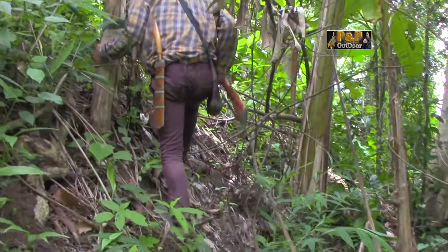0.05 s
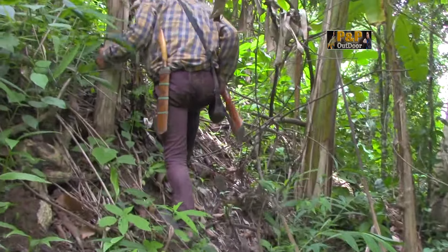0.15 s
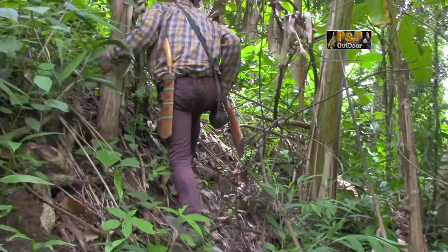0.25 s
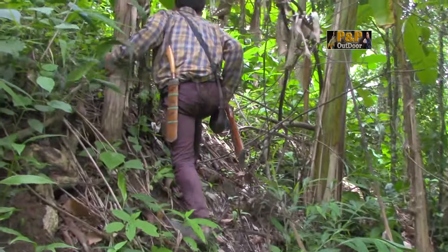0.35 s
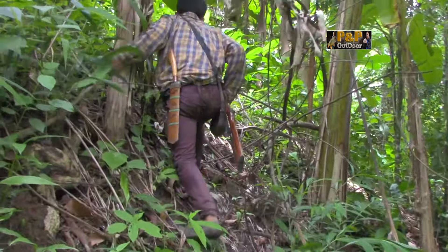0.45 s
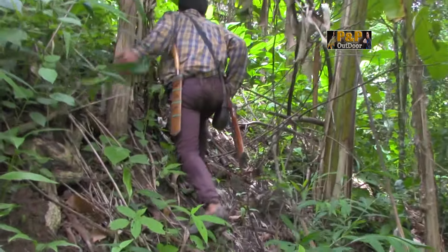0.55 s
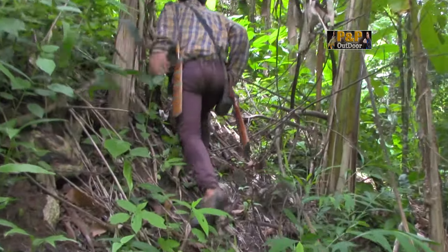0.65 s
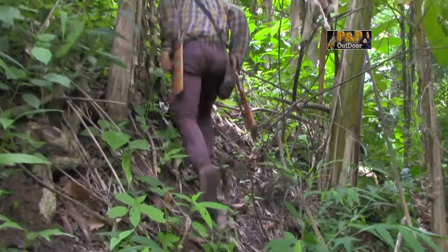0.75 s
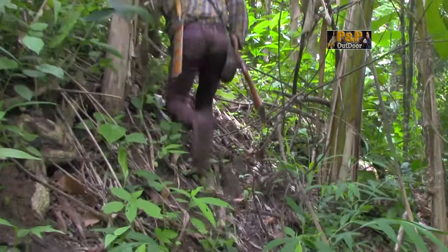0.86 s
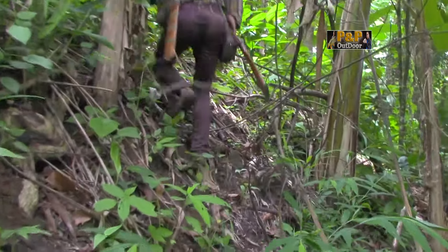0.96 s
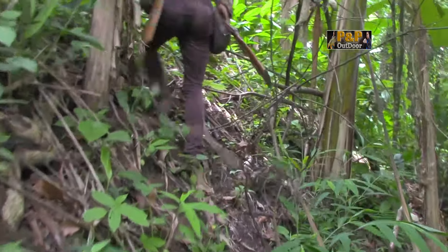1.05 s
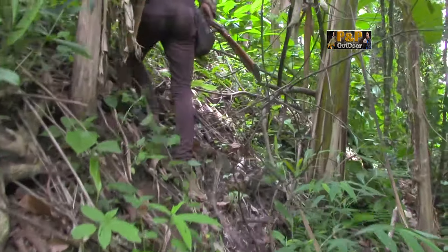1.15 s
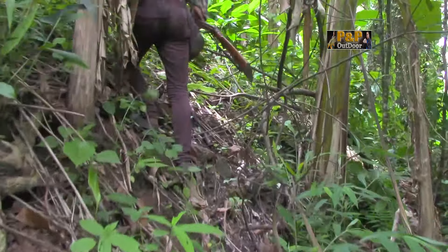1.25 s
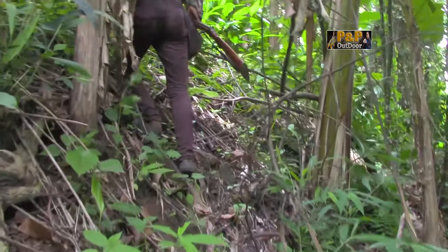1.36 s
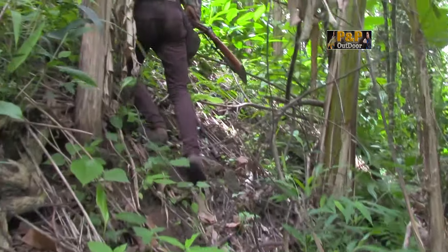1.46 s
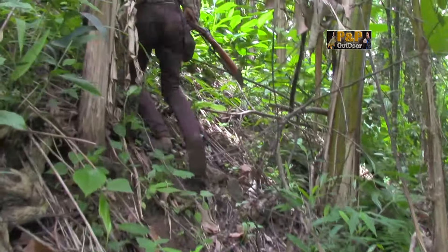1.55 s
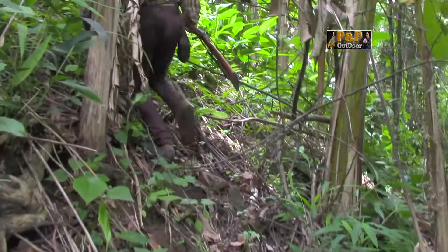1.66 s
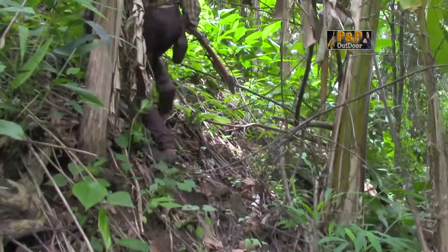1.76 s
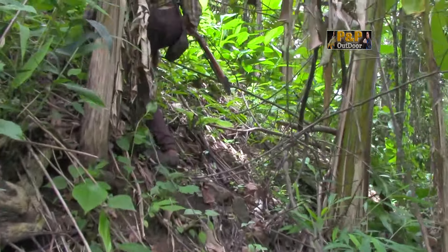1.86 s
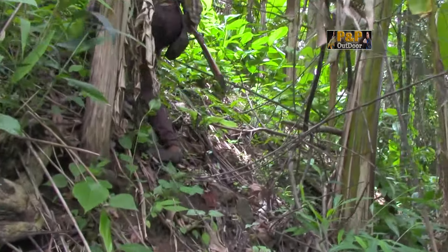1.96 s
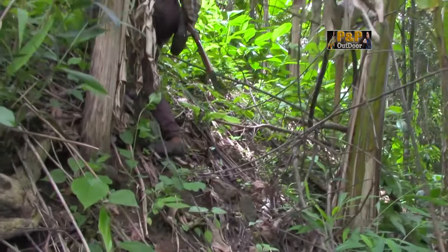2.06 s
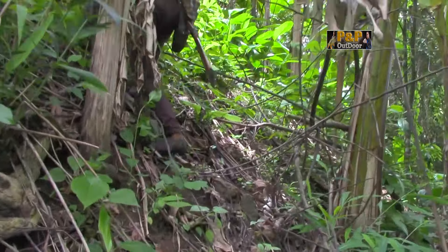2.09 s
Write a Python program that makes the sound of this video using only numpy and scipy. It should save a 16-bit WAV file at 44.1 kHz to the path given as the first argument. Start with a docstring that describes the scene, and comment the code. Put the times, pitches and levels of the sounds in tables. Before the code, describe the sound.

A bird whistles downward again and again in a forest as someone climbs through crackling leaf litter, then shuffles in the undergrowth.

```python
"""Over still forest air and a thin shimmer of insects, someone climbs a slope through dry leaves. From the
start a bird repeats falling whistles, long slides and stepped ones in no fixed order, echoed by the trunks.
Leaves rustle, twigs snap, dull knocks land on the soil and clumps of leaves crunch underfoot. Then the walker
stops and shifts about in the undergrowth: a softer rustle, more snaps and crunches."""
import sys
import numpy as np
from scipy import signal
from scipy.fft import rfft, irfft, next_fast_len
from scipy.io import wavfile
from scipy.ndimage import map_coordinates

SR = 44100
rng = np.random.default_rng(int(sys.argv[2]) if len(sys.argv) > 2 else 0)


def pcm_store(signal):
    """Save signal as 16-bit PCM."""
    levels = np.round(np.clip(np.atleast_2d(signal), -1, 1) * 32767)
    wavfile.write(sys.argv[1], SR, levels.astype(np.int16).T)


N = 264688
TOP_HZ = 16000

# Litter spectra: soil, leaves, dry leaf edges. Each row: frequency in Hz, relative density in dB.
SOIL_SPECTRUM = [(30, -90), (60, -21), (110, -8), (230, 7.5), (550, 7.5), (1000, 0.5), (1500, -1.5),
                 (3000, -23.5)]
LEAF_SPECTRUM = [(60, -45), (500, -26), (900, 6), (1400, 5.5), (3000, 6), (5300, -2), (7000, -5),
                 (11000, -59)]
EDGE_SPECTRUM = [(100, -42), (3500, 3.5), (5200, 6.5), (6500, 6.5), (8200, 7), (10500, 3.5), (13000, -3),
                 (16000, -16)]


def amp(db):
    """Decibels to gain."""
    return 10 ** (np.asarray(db) / 20)


def unit_rms(x):
    """Scale to rms 1."""
    return x / np.sqrt(np.mean(x ** 2) + 1e-20)


def unit_energy(x):
    """Scale to energy 1."""
    return x / np.linalg.norm(x)


def along(points, hz):
    """Read (Hz, value) points on a log axis."""
    knots_hz, values = np.transpose(points)
    return np.interp(np.log(hz + 1), np.log(knots_hz + 1), values)


def wobble(knots_per_s):
    """Smooth random curve."""
    knots = rng.standard_normal(int(N * knots_per_s / SR) + 4)
    return map_coordinates(knots, [np.arange(N) * knots_per_s / SR])


def filtered(x, response):
    """Zero-phase filter with gain response(hz)."""
    m = next_fast_len(N + SR // 4)
    return irfft(rfft(x, m) * response(np.fft.rfftfreq(m, 1 / SR)), m)[:N]


def shaped(x, spectrum):
    """Filter by (Hz, dB) points."""
    return filtered(x, lambda hz: amp(along(spectrum, hz)))


def struck(x, response):
    """Short sound through a minimum-phase filter, at energy 1."""
    n = len(x)
    cepstrum = irfft(np.log(response(np.fft.rfftfreq(n, 1 / SR) + 1) + 1e-6), n)
    cepstrum[1:n // 2] *= 2
    cepstrum[n // 2 + 1:] = 0
    return unit_energy(irfft(rfft(x) * np.exp(rfft(cepstrum)), n))


def add(track, start_s, x):
    """Mix x into the track."""
    i = max(0, round(start_s * SR))
    track[i:i + len(x)] += x[:max(0, N - i)]


def air_and_insects():
    """Still forest air and narrow bands of distant insects that swell together."""
    # Each row: frequency in Hz, relative density in dB.
    air_spectrum = [(25, -27), (45, -23), (80, -12), (250, 0), (600, -1), (1100, -9), (2500, -11),
                    (5000, -15), (8000, -18), (12000, -25), (16000, -33)]
    # Each row: centre in Hz, width in Hz, level in dB, share of a swell followed.
    choruses = [(4590, 170, -59, .8), (4780, 250, -63, .8), (6720, 110, -62.3, .3), (9010, 110, -62.6, .3),
                (9540, 170, -61.3, .3), (9980, 230, -68, .3)]
    # Each row: peak time in seconds, rise in dB.
    swells = [(1.61, 7), (2.43, 7), (2.74, 7), (3.54, 7), (3.77, 4), (4.19, 5.5), (4.5, 4), (5.46, 5),
              (5.7, 4), (5.96, 5)]
    t, swell_width_s = np.arange(N) / SR, .06
    swell_db = sum(db * np.exp(-.5 * ((t - peak_s) / swell_width_s) ** 2) for peak_s, db in swells)
    track = amp(-53) * unit_rms(shaped(rng.standard_normal(N), air_spectrum))
    for centre_hz, width_hz, db, share in choruses:
        chorus = filtered(rng.standard_normal(N),
                          lambda hz: np.exp(-.5 * ((hz - centre_hz) / width_hz) ** 2))
        track += amp(db + share * swell_db + 1.2 * wobble(14)) * unit_rms(chorus)
    return track


def stir_db():
    """How hard the walker disturbs soil and leaves, per sample."""
    # Each row: time in seconds, soil level in dB, leaf level in dB.
    effort = [(0.0, -41, -45), (0.3, -46, -42.5), (.48, -41, -38.5), (.62, -38.5, -39.5),
              (0.72, -39.5, -37), (.83, -39, -37), (.91, -41.5, -38.5), (1.02, -40, -36.5),
              (1.17, -42, -37.5), (1.42, -42, -43.5), (1.8, -43, -47), (1.97, -45, -44.5),
              (2.15, -49.5, -50), (2.38, -50, -44.5), (2.59, -43, -48), (2.76, -41, -43),
              (2.94, -44, -49.5), (3.2, -53, -48.5), (3.33, -52.5, -50), (3.62, -51, -58.5),
              (3.78, -49.5, -50.5), (4.03, -51, -55), (4.45, -52.5, -48.5), (4.6, -50, -53),
              (4.72, -49, -45), (4.9, -52.5, -50), (5.14, -51.5, -47.5), (5.52, -60, -52.5),
              (5.72, -59, -51.5), (6.0, -60, -49.5)]
    times_s, *levels_db = np.transpose(effort)
    return [np.interp(np.arange(N) / SR, times_s, db) for db in levels_db]


def ticks(per_s, centre_hz, cycles, spread_db):
    """Single leaves and stalks flick and ring for a few cycles, each at its own pitch."""
    starts = (rng.random((int(per_s * N / SR), 1)) * N).astype(int)
    traits = rng.standard_normal((len(starts), 2))
    hz = np.clip(centre_hz * 2 ** (0.81 * traits[:, :1]), 500, 13000)
    size = amp(spread_db * np.minimum(traits[:, 1:], 2)) * np.sqrt(hz)
    i = np.arange(SR // 100)
    phase = hz * i / SR
    grains = size * np.sin(2 * np.pi * phase) * np.exp(-phase / cycles)
    return unit_rms(np.bincount((starts + i).ravel(), grains.ravel(), N)[:N])


def crackle(spectrum, per_s, spread_db, blur):
    """Tiny fractures of unequal size over their own blurred scatter."""
    breaks = rng.random(N) < per_s / SR
    sizes = rng.choice([-1, 1], N) * amp(spread_db * np.minimum(rng.standard_normal(N), 2))
    grains = unit_rms(breaks * sizes) + blur * rng.standard_normal(N)
    return unit_rms(shaped(grains, spectrum))


def rustle():
    """Legs move the litter: soil scuffs, leaves catch and slip in clumps, dry edges sizzle."""
    scuff_db, rustle_db, sizzle_db = 0.5, 1, -1  # relative to the stir
    soil_db, leaf_db = stir_db()
    clumps_db = 1.1 * wobble(55)
    flicks = ticks(per_s=220, centre_hz=2800, cycles=3, spread_db=5)
    prickles = ticks(per_s=350, centre_hz=8000, cycles=3, spread_db=5)
    soil = crackle(SOIL_SPECTRUM, per_s=500, spread_db=3, blur=.9)
    leaves = unit_rms(crackle(LEAF_SPECTRUM, per_s=900, spread_db=5, blur=1) + .55 * flicks)
    edges = unit_rms(crackle(EDGE_SPECTRUM, per_s=900, spread_db=5, blur=1.2) + .3 * prickles)
    foliage = amp(rustle_db) * leaves + amp(sizzle_db + wobble(76)) * edges
    return amp(clumps_db) * (amp(soil_db + scuff_db) * soil + amp(leaf_db) * foliage)


def whistles(contour, calls):
    """A nearly pure tone quavers more as it falls; foliage scatters and blurs it."""
    held_s, falling_s, quaver_depth, thicket_t60_s = .14, .2, .024, .22
    track = np.zeros(N)
    times_s, pitch_hz, level_db = np.transpose(contour)
    fade = amp(-60 * np.arange(SR // 4) / SR / thicket_t60_s)
    for start_s, db, transpose, stretch, direct in calls:
        t = np.arange(int(times_s[-1] * stretch * SR)) / SR / stretch
        depth = np.interp(t, [held_s, falling_s], [quaver_depth / 3, quaver_depth])
        quaver = depth * wobble(260)[:len(t)]
        flutter_db = 2 * wobble(45)[:len(t)]
        hz = transpose * np.interp(t, times_s, pitch_hz) * (1 + quaver)
        envelope = amp(db + flutter_db + np.interp(t, times_s, level_db))
        call = envelope * np.sin(2 * np.pi * np.cumsum(hz) / SR)
        thicket = unit_energy(fade * rng.standard_normal(len(fade)))
        add(track, start_s, np.sqrt(direct) * call)
        add(track, start_s, np.sqrt(1 - direct) * signal.fftconvolve(call, thicket))
    return track


def bird():
    """Long slides and stepped whistles recur in no fixed order; the trunks answer."""
    # Each row: time into the whistle in seconds, pitch in Hz, relative level in dB.
    slide = [(0, 4350, -22), (.035, 4100, -8), (.07, 3900, -5), (.095, 3820, 0), (.115, 3790, 1),
             (.15, 3710, -2), (.195, 3540, -1.5), (.24, 3340, -1), (.29, 3150, 0), (.335, 2850, -4),
             (.38, 2700, -9), (.42, 2650, -35)]
    stepped = [(0, 4450, -16), (.03, 4310, -3.5), (.08, 4270, -2), (.11, 4200, -7), (.125, 3850, -6),
               (.145, 3580, 0), (.2, 3330, 1), (.235, 3150, -1), (.29, 2850, -24)]
    # Each row: start in seconds, level in dB, pitch factor, length factor, direct share of power.
    slide_calls = [(0.0, -45.3, 1.0, 1.04, .25), (1.435, -45.2, 1.0, 1.08, .2), (3.05, -47.5, .98, .9, .05),
                   (3.805, -43, 1.0, 1.0, .55)]
    stepped_calls = [(2.135, -49.8, 1.01, 1.04, .15), (4.385, -48.5, 1.0, 1.1, .02),
                     (5.72, -50.5, 1.0, 1.1, .05)]
    song = whistles(slide, slide_calls) + whistles(stepped, stepped_calls)
    return song + amp(-8) * echoes(song)


def echoes(x):
    """Trunks and foliage return a diffuse tail after 8 ms."""
    # Each row: frequency in Hz, t60 in seconds.
    decay = [(150, .4), (1000, .55), (4000, .65), (12000, .25)]
    hz, t, noise = signal.stft(rng.standard_normal(SR // 2), SR, nperseg=256)
    tail = signal.istft(noise * amp(-60 * t / along(decay, hz)[:, None]), SR, nperseg=256)[1]
    return signal.fftconvolve(np.pad(x, (int(.008 * SR), 0)), unit_energy(tail))[:N]


def stray_stalks(per_s, over_stir_db, centre_hz):
    """Small stalks give way at random, louder in a harder stir. Returns rows for snaps()."""
    leaf_db = stir_db()[1]
    starts = rng.integers(0, N, per_s * N // SR)
    traits = rng.standard_normal((len(starts), 2))
    return [(i / SR, leaf_db[i] + over_stir_db - 1.5 * weakness, centre_hz * 2 ** (pitch / 2), 1)
            for i, (weakness, pitch) in zip(starts, traits)]


def snaps():
    """Twig fibres tear, the broken ends ring briefly, ground and leaves throw the crack back."""
    # Each row: start in seconds, strength in dB, centre in Hz, half-width in octaves.
    twigs = [(.128, 2.5, 4150, 0.93), (.2816, -12, 3330, 1.3), (.367, -9, 2940, 0.6), (.39, -4, 4550, 1.2),
             (.5461, 9, 7850, 0.39), (.5463, 2, 1520, 1.8), (.549, 0, 8500, 1.55), (.583, -9, 1000, 0.73),
             (.5895, -4.5, 750, 0.74), (.606, -9, 10000, 0.35), (.6393, -5, 1400, 0.55),
             (.6585, -11, 2300, 1.3), (.6922, -3.5, 3880, 0.63), (.6957, -8, 4470, 0.84),
             (.7322, -5.5, 5460, 1), (.7468, -2.5, 1290, 0.9), (.812, -7, 4500, 1.6),
             (.848, -6.5, 9000, .5), (.992, -10, 1400, 0.59), (.993, -6, 7100, 0.69),
             (1.097, -8, 2420, 0.95), (1.103, -3.5, 3230, 0.8), (1.107, -1.5, 9000, 0.39),
             (1.115, -4, 8000, 1.1), (1.238, -10, 1800, 0.82), (1.246, -6, 5500, 0.59),
             (1.3273, -9.5, 4600, 0.36), (1.346, -12, 3800, 1.2), (1.3501, -5.5, 4220, 0.74),
             (1.421, -9, 3000, .7), (1.439, -16, 10000, 0.56), (1.846, -2, 2210, 3.5),
             (1.853, 2, 5100, 0.59), (1.865, -7, 1200, 1.1), (1.874, 2, 4880, 1.74),
             (2.1554, -17, 2010, 1.3), (2.2447, -22, 2800, 0.86), (2.475, -14, 5000, 0.78),
             (2.698, -3.5, 9000, 0.65), (2.841, -13, 2200, 0.5), (3.0374, -7, 2400, 0.41),
             (3.06, -5, 1270, 1.5), (3.073, -10, 1700, 1.1), (3.086, -4.5, 2180, 1.3),
             (3.14, -8, 4000, 0.68), (3.2025, -9, 1610, 1.04), (3.3746, -16, 2000, 0.95),
             (3.4395, -10.5, 3990, 1.8), (3.4599, 2.5, 1310, 1.17), (3.4637, 0, 1880, 1.13),
             (3.495, -14, 3500, 0.76), (3.673, -13, 1380, 1.1), (3.721, -14, 3180, 1.1),
             (3.762, -12.5, 2920, 1.2), (4.4273, -31, 3600, .8), (4.45, -7, 3600, 0.62),
             (4.4752, -17, 5500, 1.9), (4.75, -18, 5000, 1.6), (4.783, -15.5, 10840, 0.36),
             (4.831, -10.5, 890, 1.7), (4.833, -15, 2400, .4), (4.9495, -11, 4500, 1.4),
             (4.955, -7, 4500, 1.3), (5.024, -17, 2600, 0.6), (5.029, -11, 6460, 1),
             (5.1945, -11.5, 8500, 0.31), (5.1995, -10, 7000, 1.3), (5.223, -13, 7600, 0.74),
             (5.4155, -16.5, 3620, 0.47), (5.5308, -26, 2930, 0.37), (5.57, -8.5, 2460, 2.5),
             (5.6096, -15, 3600, .7), (5.625, -14.5, 6000, 2.7), (5.7842, -16, 4170, 1.4),
             (5.8165, -10, 2070, 1.26)]
    tear_t60_s, scatter_t60_s, wood_t60_s = .003, .03, .018
    ground_db, wood_db = -10, -8
    track, t = np.zeros(N), np.arange(SR // 10) / SR
    stalks = stray_stalks(per_s=5, over_stir_db=13.5, centre_hz=3080)
    for start_s, db, centre_hz, octaves in list(twigs) + stalks:
        def band(hz):
            off_centre = np.log2(hz / centre_hz) / octaves
            return ((1 + off_centre ** 4) * (1 + (hz / 11000) ** 6) * (1 + (200 / hz) ** 4)) ** -.5

        fibres = rng.standard_normal(len(t)) * amp(-60 * t / tear_t60_s)
        tear = struck(fibres, lambda hz: 1 / np.abs(rfft(fibres)))  # flat spectrum, no pitch
        scatter = rng.standard_normal(len(t)) * amp(-60 * t / scatter_t60_s)
        scatter = unit_energy(scatter * (1 - np.exp(-t / tear_t60_s)))
        scatter_db = -2.5 - 0.34 * db  # weak twigs lie deeper and scatter more
        bounce = np.roll(tear, int(rng.uniform(.0025, .0036) * SR))
        pulse = tear + amp(ground_db) * bounce + amp(scatter_db) * scatter
        modes_hz = np.minimum(centre_hz * 2 ** (.55 * octaves * rng.standard_normal((4, 1))), TOP_HZ)
        wood = np.sin(2 * np.pi * modes_hz * t).sum(axis=0) * amp(-60 * t / wood_t60_s)
        crack = struck(pulse, band) + amp(wood_db) * struck(wood, band)
        add(track, start_s, amp(db) * unit_energy(crack))
    return track


def knocks():
    """Blunt contact on soil, roots or hollow sticks rings two damped modes and shakes debris."""
    # Each row: start in seconds, strength in dB, pitch in Hz, t60 in seconds.
    contacts = [(.129, -11, 950, .06), (.628, -12, 450, .03), (.64, -6, 400, .055), (.871, -7, 790, .03),
                (.877, -9, 520, .03), (.97, -9, 750, .04), (1.3465, -9, 4100, .025), (1.639, -12, 330, .05),
                (1.85, -7, 590, .06), (2.70, -5.5, 1480, .05), (3.004, -4, 420, .025), (3.06, -5, 595, .04),
                (3.461, -13, 860, .04), (3.466, -6, 590, .09), (3.468, -22, 95, .12),
                (4.318, -24.5, 105, .12), (4.4505, -17, 3400, .025), (4.831, -4.5, 225, .11),
                (4.832, -9, 315, .08), (5.023, -17, 930, .04), (5.024, -10.5, 2250, .03),
                (5.026, -13, 3170, .03), (5.205, -17, 900, .06), (5.425, -18, 420, .05),
                (5.57, -16, 470, .05), (5.571, -16, 1690, .03), (5.572, -18, 6900, .03),
                (5.817, -16, 2820, .03)]
    track, t = np.zeros(N), np.arange(SR // 3) / SR
    for start_s, db, pitch_hz, t60_s in contacts:
        fade = amp(-60 * t / t60_s)
        phase = 2 * np.pi * pitch_hz * t
        modes = fade * (np.sin(phase) + 0.5 * np.sqrt(fade) * np.sin(2.06 * phase))
        ring = struck(modes, lambda hz: hz / np.hypot(hz, pitch_hz))  # small bodies radiate little bass
        shake = fade * rng.standard_normal(len(t))
        debris = struck(shake, lambda hz: 1 / (1 + 2 * np.log2(hz / pitch_hz) ** 4))
        add(track, start_s, amp(db) * (ring + 0.72 * debris))
    return track


def crunches():
    """A foot or hand crushes leaves: fractures swell and thin out. Crisper means more edge, less soil."""
    # Each row: start in seconds, length in seconds, leaf level in dB, crispness in dB.
    crushes = [(0.333, 0.073, -43, -6), (.585, 0.086, -47.5, -10), (.78, 0.069, -39, 4),
               (.955, 0.04, -44, 9.5), (1.09, 0.054, -33.5, 2.5), (1.234, 0.05, -39.5, -6),
               (1.837, 0.059, -33, 1.5), (2.437, 0.062, -50.5, 8.5), (2.695, 0.027, -50.5, 14.5),
               (3.01, 0.08, -38, -2.5), (3.051, 0.089, -37, 2), (3.456, 0.069, -51, -14.5),
               (4.202, 0.1, -44.5, 1), (4.301, 0.055, -39, -0.5), (4.859, 0.041, -44, -0.5),
               (4.948, 0.021, -42.5, 0), (5.015, 0.027, -44, 6), (5.19, 0.054, -45.5, 2.5),
               (5.26, 0.051, -48.5, 8.5), (5.398, 0.046, -47.5, 6), (5.6, 0.054, -46, 1.5),
               (5.806, 0.071, -46, 5.5)]
    soil_db, edge_db = -2, -3.5  # relative to the leaves
    pressure = np.zeros((3, N))
    for start_s, length_s, db, crisp_db in crushes:
        progress = np.linspace(0, 1, int(length_s * SR))
        swell = unit_rms(progress ** 0.5 * (1 - progress) ** 0.59)
        for track, part_db in zip(pressure, [soil_db - crisp_db, 0, edge_db + crisp_db]):
            add(track, start_s, amp(db + part_db) * swell)
    flicks = ticks(per_s=700, centre_hz=3000, cycles=2.5, spread_db=4)
    soil = crackle(SOIL_SPECTRUM, per_s=900, spread_db=3, blur=.6)
    leaves = unit_rms(crackle(LEAF_SPECTRUM, per_s=1600, spread_db=5, blur=.7) + .6 * flicks)
    edges = crackle(EDGE_SPECTRUM, per_s=2000, spread_db=6, blur=.7)
    return np.sum(pressure * [soil, leaves, edges], axis=0)


def leaf_scatter(x, t60_s=.035):
    """Side signal: nearby leaves scatter sound unequally to the two microphones."""
    t = np.arange(SR // 10) / SR
    scatter = rng.standard_normal(len(t)) * amp(-60 * t / t60_s)
    return signal.fftconvolve(x, unit_energy(scatter))[:N]


def scene():
    """Walker ahead and fairly dry, bird deep in the trees; only scatter and ambience have width."""
    # Each row: frequency in Hz, side over mid in dB.
    source_width = [(100, -33), (500, -31), (1300, -33), (2500, -23), (5000, -20.5), (9000, -18),
                    (15000, -18)]
    air_width = [(50, 3.5), (250, -6.5), (700, -9.5), (1300, -15), (4500, -16), (9000, -12)]
    thud_cut_hz, balance_db = 68, .12  # loose litter gives no deep thud
    hits = filtered(crunches() + snaps() + knocks(),
                    lambda hz: hz ** 4 / np.hypot(hz ** 4, thud_cut_hz ** 4))
    sources = rustle() + hits + amp(-12.5) * echoes(hits) + bird()
    mid = sources + air_and_insects()
    side = shaped(leaf_scatter(sources), source_width) + shaped(air_and_insects(), air_width)
    return np.array([mid + side, mid - side]) * amp([[balance_db], [-balance_db]])


def record(dry):
    """The camera rounds peaks toward full scale, rolls off deep bass and limits the band."""
    low_cut_hz = 70
    rounded = dry / (1 + dry ** 4) ** (1 / 4)
    passband = lambda hz: hz ** 2 / np.hypot(hz ** 2, low_cut_hz ** 2) * (hz < TOP_HZ)
    return np.array([filtered(channel, passband) for channel in rounded])


dry = scene()
out = record(dry)
pcm_store(out)
```